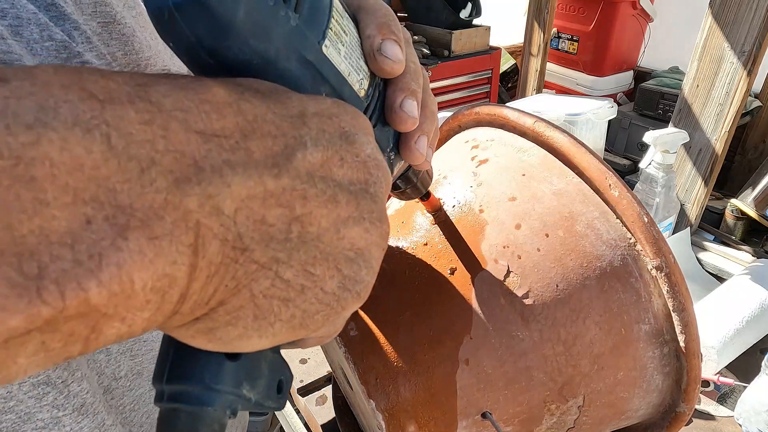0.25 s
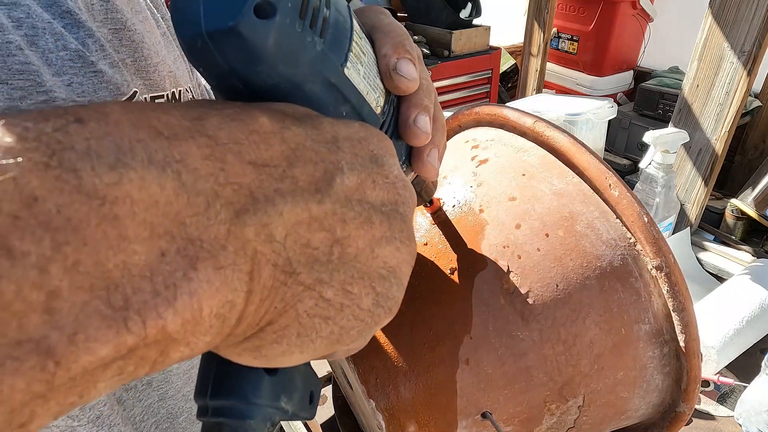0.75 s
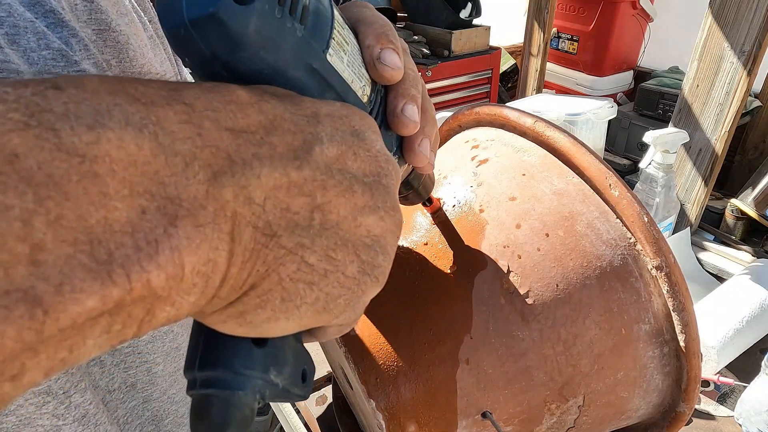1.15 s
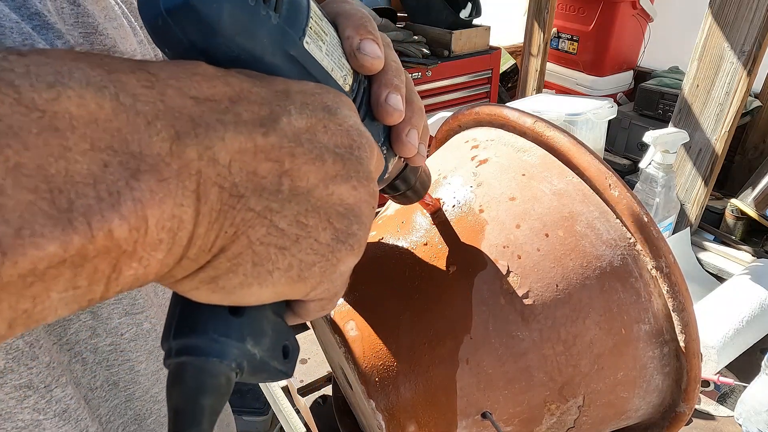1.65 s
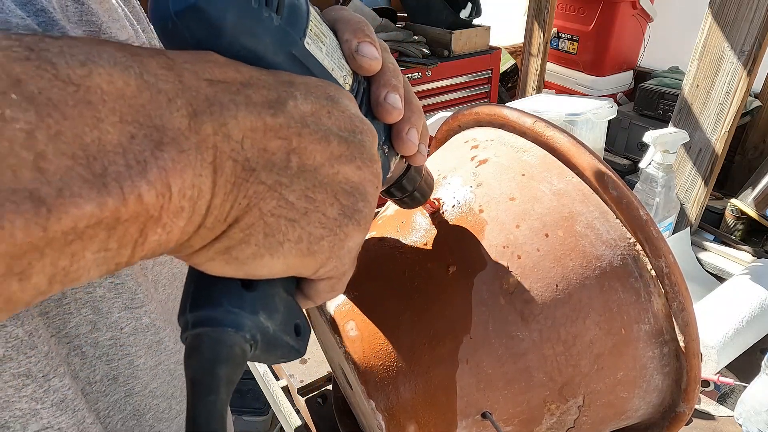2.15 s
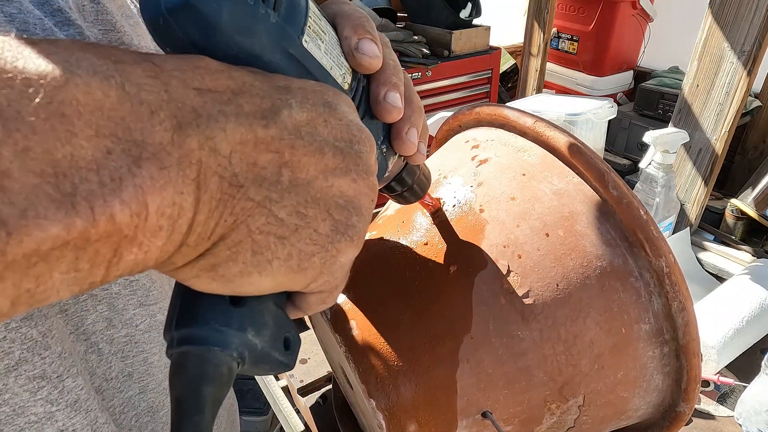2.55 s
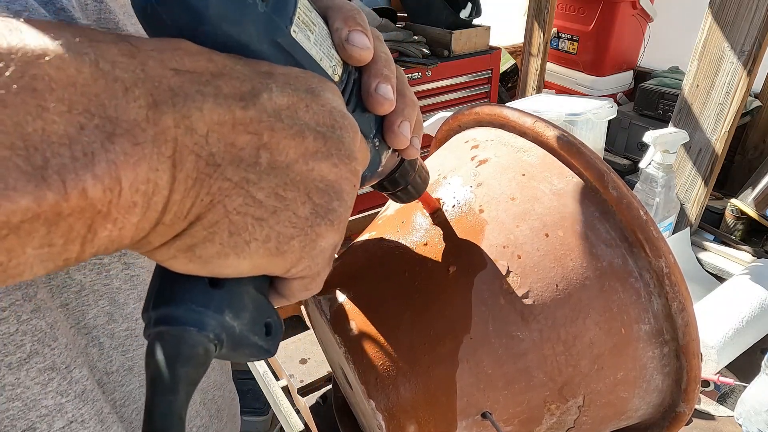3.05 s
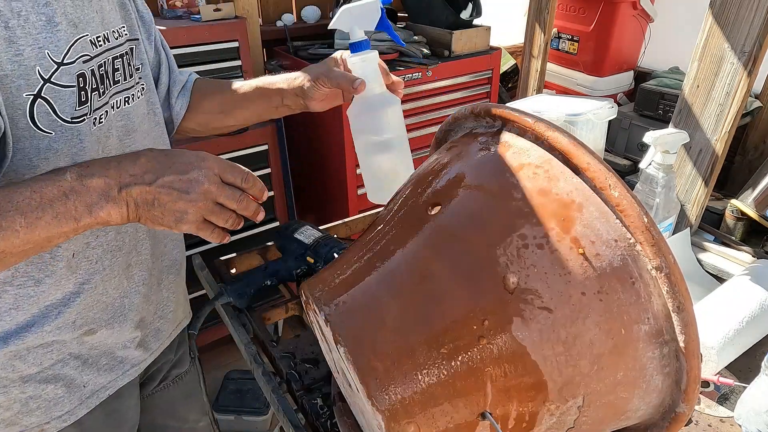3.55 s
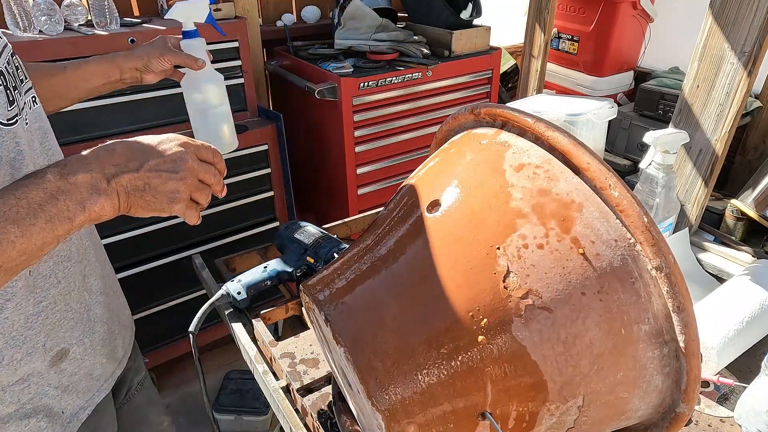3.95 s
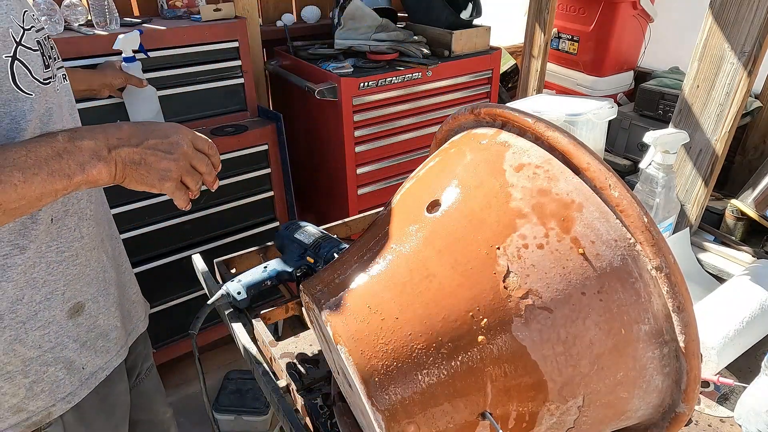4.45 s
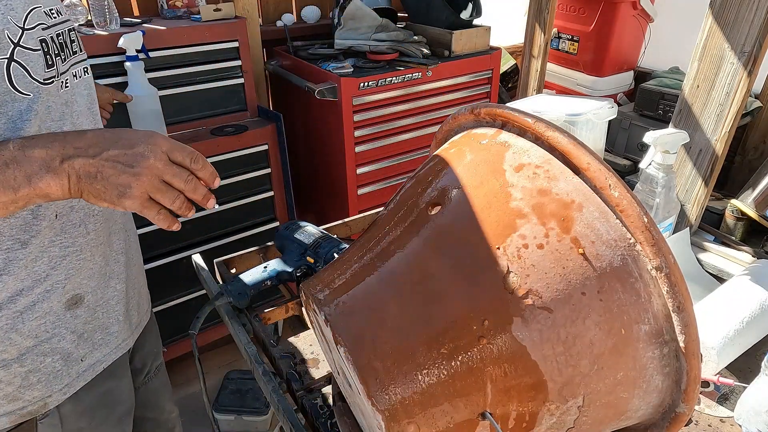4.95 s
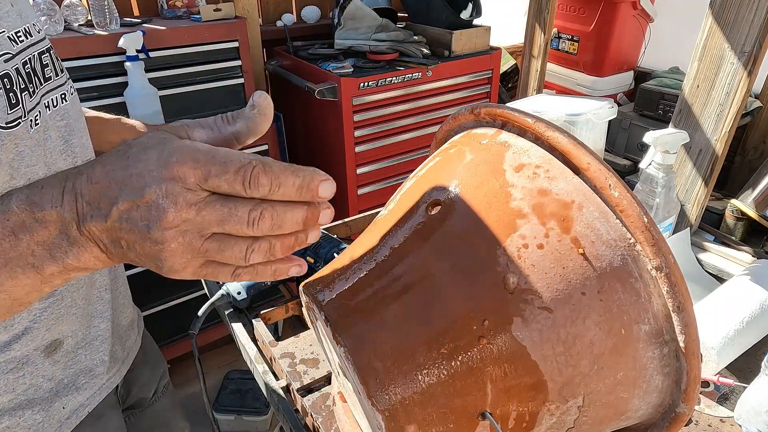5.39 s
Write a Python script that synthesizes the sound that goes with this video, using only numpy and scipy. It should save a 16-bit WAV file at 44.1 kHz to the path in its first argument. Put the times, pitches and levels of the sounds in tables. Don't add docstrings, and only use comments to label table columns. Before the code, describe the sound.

A drill-driven hole saw skates hissing on wet clay, bites into loud rough grinding with sliding motor whine, then cuts to windy quiet and a bottle knock.

```python
import sys
import numpy as np
from scipy import signal
from scipy.fft import rfft, irfft, next_fast_len
from scipy.io import wavfile
from scipy.ndimage import uniform_filter1d

SR = 44100
rng = np.random.default_rng(int(sys.argv[2]) if len(sys.argv) > 2 else 0)


def dump_mix(stems):
    frames = np.atleast_2d(stems).T
    limited = np.clip(frames, -1, 1)
    pcm = np.round(limited * 32767).astype(np.int16)
    wavfile.write(sys.argv[1], SR, pcm)


def field_ratio(decibels):
    return 10 ** (np.asarray(decibels, dtype=float) / 20)


N = 247842

CUT_S = 3.154
BITE_S = .594
MAINS_HZ = 59.8
FIRM_DB = -20

# (frequency [Hz], density [dB per Hz])
YARD_COLOUR = [(71, -34.5), (120, -9), (178, -10.5), (258, -11.5), (296, -29.5), (339, -7.5), (522, -22.5),
               (554, -20), (758, -34.5), (1020, -15.5), (1240, -16.5), (1390, -20), (1500, -23),
               (6810, -35.5), (8200, -38), (9500, -49), (13000, -64)]
# (frequency [Hz], correlation [0-1])
YARD_LIKENESS = [(60, 0.99), (240, 1), (950, 0.84), (3770, 0.4), (15000, 1)]
# (time [s], level [dB])
BREEZE = [(0, -78), (.28, -75), (.36, -56), (.6, -52), (1.3, -54), (2.3, -68), (2.45, -74), (2.8, -58),
          (3.3, -56.5), (3.55, -48), (4.0, -46), (4.5, -43.5), (4.7, -36.5), (5.4, -47), (5.62, -48)]
# (start [s], length [s], peak [dB], puff share [dB], pan [dB])
GUSTS = [
    (3.395, 0.22, -41.5, -33, 0),
    (3.865, 0.24, -38.5, -16, 4),
    (4.044, 0.26, -29.5, -4, -4.5),
    (4.259, 0.18, -32.5, -35, -6),
    (4.57, 0.11, -35, 4, 5),
    (4.688, 0.14, -35, -7, 3),
    (4.968, 0.38, -29, -6.5, -6),
    (5.257, 0.27, -31, -42, -6),
]
# (time [s], peak [dB], pan [dB], push 1 or pull -1)
POPS = [
    (4.114, -20, 2, -1),
    (4.168, -21, -5, 1),
    (4.197, -18, -6, 1),
    (5.111, -18, -4, 1),
    (5.195, -19, 0, -1),
    (5.282, -23, 5, -1),
]
# (frequency [Hz], level [dB])
BUFFET_COLOUR = [(10, 1.5), (30, 7), (60, 3.5), (110, -15), (200, -50), (400, -81)]
# (frequency [Hz], level [dB])
PUFF_COLOUR = [(40, -15), (100, 6.5), (150, -2), (250, -9), (400, -10.5), (700, -77)]

# (time [s], peak [dB], centre [Hz], length [s], pan [dB])
BRUSHES = [(3.283, -47, 3050, 0.01, -3), (3.2955, -41, 2740, 0.0036, 1), (3.298, -44, 2780, 0.022, -3),
           (3.394, -54, 2500, 0.017, 0), (3.5185, -43, 1500, 0.007, 1), (3.54, -54.5, 3600, 0.14, 1),
           (3.6, -48, 1350, 0.085, -1), (3.782, -50, 2000, 0.0083, -2), (4.467, -57, 3000, 0.016, -7),
           (4.673, -42, 4450, 0.018, 5), (4.74, -48, 1190, 0.085, 3), (4.8005, -43.5, 4000, 0.024, 1),
           (4.96, -57, 3000, 0.044, 4), (5.42, -63, 2500, 0.25, 0), (5.265, -60, 2500, 0.0092, -2),
           (5.441, -54, 2000, .006, 0), (5.471, -53, 2500, .006, 0), (5.5635, -50, 2500, .005, 0)]
# (time [s], peak [dB], centre [Hz], length [s], pan [dB])
CLICKS = [(3.515, -57, 8000, .004, 4), (3.535, -48.5, 1310, 0.059, 0), (3.576, -49, 1000, 0.014, 0),
          (3.789, -55, 4970, .003, -1), (3.7957, -56, 9000, .004, -1), (3.84, -48, 1910, 0.0066, -3),
          (3.9015, -48, 5000, .003, 3), (3.906, -54, 8400, .012, 3), (3.921, -51, 6500, .004, 3),
          (3.958, -45, 1400, 0.016, -1), (4.584, -58.5, 8600, .15, 9), (4.876, -68, 7000, .008, 4),
          (4.993, -63, 4500, .008, -4), (5.232, -44, 1860, 0.005, 0.5)]
# (time [s], peak [dB], centre [Hz], length [s], pan [dB])
TAPS = [
    (3.17, -55.5, 320, 0.22, 2),
    (3.195, -60, 2330, 0.097, 0),
    (3.302, -46, 1680, 0.029, -2),
    (3.703, -62, 10000, .012, -2.5),
    (4.212, -47, 1120, 0.028, -2),
    (4.802, -47, 2800, 0.027, -2),
]
# (time [s], peak [dB], centre [Hz], length [s], pan [dB])
RUBS = [
    (3.945, -51.5, 2500, 0.051, -1),
    (4.198, -48, 2500, 0.043, -1),
    (5.49, -54.5, 2500, .06, 0),
]

# (frequency [Hz], level [dB], t60 [s])
CHEST_MODES = [(53, -27, 0.32), (105.3, -20.5, 0.4), (145.3, -29, 0.49), (164.6, -31.5, 0.37),
               (257.5, -39, 0.92), (293, -42, 0.36), (427.3, -29.5, 0.45), (457, -38, 0.27),
               (643, -42, 0.79), (1014, -32, 0.34), (1140, -38, 0.4), (1270, -50, .23), (1380, -33, 0.17),
               (1580, -36, 0.36)]
# (frequency [Hz], width [Hz], level [dB])
BOTTLE_TICK = [(2500, 250, -31.5), (3250, 300, -35), (4400, 390, -33.5), (5390, 580, -39),
               (7460, 2300, -52)]
# (frequency [Hz], density [dB per Hz])
RATTLE_COLOUR = [(88, -39), (150, -8), (346, -14.5), (468, -11.5), (566, -16.5), (1120, -12), (1330, -12.5),
                 (2740, -18), (7770, -34), (14000, -74)]
# (frequency [Hz], t60 [s])
RATTLE_T60 = [(200, 1), (600, 0.77), (1500, 0.44), (4000, 0.41), (12000, 0.4)]

# (time [s], speed [turns/s])
MOTOR_SPEED = [(.72, 200), (.78, 265), (.83, 311), (.93, 378), (1.03, 437), (1.2, 524), (1.35, 581),
               (1.5, 623), (1.7, 655), (1.79, 621), (2.0, 550), (2.32, 448), (2.68, 347), (2.74, 360),
               (2.85, 393), (3.0, 427), (3.08, 418), (3.15, 400)]
# (order [per turn], width [Hz])
ORDER_WIDTHS = [(1, 14), (2, 36), (3, 18), (12, 70)]
# (frequency [Hz], level [dB])
GEARBOX = [(1200, -56), (1550, -50), (1700, -42), (1850, -31.5), (2150, -31), (2600, -32), (2900, -31.5),
           (3250, -35), (3900, -38.5)]
# (frequency [Hz], level [dB])
HOUSING = [(250, -46), (450, -40), (640, -46), (850, -41.5), (1180, -36.5), (1650, -36), (1880, -30.5),
           (4000, -51.5), (7000, -49.5)]

# (time [s], pressure [dB])
PRESSURE = [(0.0, -29.5), (0.2, -27.5), (0.335, -28), (0.365, -33.5), (0.42, -28), (0.48, -32),
            (0.56, -33.5), (0.6, -28.5), (0.63, -34), (0.676, -25.5), (0.82, -21), (1.03, -18.5),
            (1.5, -17.5), (1.92, -20), (1.99, -19), (2.26, -19.5), (2.29, -21.5), (2.65, -25),
            (2.75, -19.5), (2.94, -21.5), (3.15, -25)]
# (start [s], drop [dB], length [s])
LIFTS = [(.021, 6.5, 0.024), (.06, 2, 0.055), (.131, 14, 0.0039), (.145, 11, 0.012), (.265, 13, 0.0058),
         (.342, 9, 0.0088), (.357, 16, 0.0055), (.395, 10, 0.0095), (.411, 5, 0.0045), (.426, 2, 0.0046),
         (.433, 3, 0.0045), (.453, 16, 0.0084), (.472, 14, .006), (.495, 7, 0.0056), (.512, 11, 0.017),
         (.538, 1, .004), (.547, 16, 0.012), (.566, 9, 0.0034), (.574, 14, 0.0065)]
# (middle [s], rise [dB])
CATCHES = [(0.699, 3), (0.742, 2.5), (0.854, 0.5), (0.945, 3), (1.264, 0), (2.13, 1.5), (2.324, 1),
           (2.419, 2), (2.521, 4), (2.575, 3.5), (2.6, 3.5), (2.661, 2.5), (2.747, 2), (2.845, 4.5),
           (2.862, 2.5), (2.913, 0), (2.931, -0.5), (2.96, 2.5), (3.036, 2.5), (3.085, 2.5), (3.112, 5.5)]
# (middle [s], drop [dB])
SLIPS = [(0.69, 6.5), (0.773, 1.5), (0.802, 3), (0.89, 2), (0.954, 4.5), (0.987, 3.5), (1.023, 2.5),
         (1.119, 6), (1.236, 3.5), (1.401, 2), (1.691, 2.5), (1.794, 2.5), (1.901, 5.5), (1.972, 3.5),
         (2.165, 2), (2.24, 6), (2.313, 4), (2.364, 3.5), (2.386, 3), (2.41, 3.3), (2.482, 6), (2.504, 3),
         (2.567, 3), (2.621, 5.5), (2.65, 2.5), (2.678, 8), (2.705, 5.5), (2.77, 8), (2.792, 3.5),
         (2.875, 2), (2.891, 11), (2.904, 1.5), (2.975, 6.2), (2.999, 5.5), (3.047, 5), (3.064, 4),
         (3.076, -1), (3.101, 9.5)]
# (frequency [Hz], density [dB per Hz])
SKATE_COLOUR = [(35, -50), (60, -58), (110, -50), (141, -28), (185, -25), (312, -13), (479, -8.5),
                (1000, -4), (1260, -7.5), (1970, 0.5), (6200, -4.5), (8060, -56), (13600, -120)]
# (frequency [Hz], density [dB per Hz])
BITE_COLOUR = [(35, -44), (60, -19.5), (236, -18), (312, -13.5), (453, -8.5), (1170, -6), (1670, 2.5),
               (2150, -0.5), (3190, 2), (5200, -5.5), (7200, -16), (8100, -42.5), (12600, -25.5),
               (15500, -45.5)]
# (frequency [Hz], width [Hz], level [dB])
GLAZE_MODES = [(2000, 99, -9), (2600, 71, -9), (3140, 740, -1.5), (4200, 580, -2)]
# (frequency [Hz], width [Hz], level [dB])
CLAY_MODES = [(1070, 326, -3), (3210, 130, -13)]
# (time [s], frequency [Hz], level [dB])
RIDGE = [(.62, 5750, -17.5), (1.1, 5550, -21), (1.6, 4860, -20.5), (2.4, 4830, -24), (3.15, 4640, -30)]
# (frequency [Hz], density [dB per Hz])
SIZZLE_COLOUR = [(2940, -22.5), (5000, -2.5), (5820, -8), (6830, -3), (9610, -7.5), (11100, -13),
                 (13300, -14.5), (15500, -12)]
# (frequency [Hz], density [dB per Hz])
SPRAY_COLOUR = [(2650, -30.5), (4500, -0.5), (6230, -11), (7590, -6.5), (8860, -10.5), (11600, -13.5),
                (14000, -24), (15500, -50)]
# (frequency [Hz], width [Hz], level [dB])
FREE_CUP_MODES = [(6800, 210, 4), (7340, 260, -2.5), (8600, 330, 1), (10500, 400, -19), (11000, 590, -14)]
# (frequency [Hz], width [Hz], level [dB])
BURIED_CUP_MODES = [(5900, 210, 0), (6800, 290, 1.5), (7580, 800, -12), (9800, 150, -13.5)]
# (time [s], level [dB])
KERF_RING = [(1.3, -10.5), (2.3, -12.5)]
# (start [s], length [s], from [Hz], to [Hz], level [dB])
SWELLS = [(0.063, .14, 7350, 7440, -38), (.1, 0.47, 11500, 11000, -43), (0.303, 0.26, 6800, 6800, -30.5),
          (0.377, 0.26, 11000, 10700, -43), (.42, .12, 13100, 13100, -47), (0.177, 0.042, 3100, 3140, -32),
          (.518, 0.02, 2570, 2600, -29), (0, 0.13, 2000, 1940, -38), (0.232, 0.089, 1950, 2000, -46.5),
          (0.407, 0.039, 1720, 1710, -35), (0.223, 0.17, 3150, 3100, -42.5),
          (0.587, 0.0092, 1200, 1200, -40), (0.6, .015, 11000, 11000, -47), (0.65, 0.027, 8600, 8600, -48),
          (0.654, 0.16, 2500, 2720, -31), (0.665, 0.18, 3130, 3280, -34), (0.666, .1, 800, 800, -39.5),
          (0.686, 0.038, 1490, 1490, -54), (0.928, 0.168, 2300, 2830, -33.5), (0.722, .2, 2300, 2310, -41),
          (0.968, 0.076, 2600, 2670, -33.5), (1.2, 0.27, 3320, 3250, -41), (1.54, 0.094, 3200, 3300, -33),
          (1.663, 0.31, 1070, 1200, -34), (1.907, 0.32, 3080, 3200, -33), (1.708, 0.43, 8600, 8500, -41),
          (1.75, .35, 10100, 10000, -45.5), (2.175, 0.26, 2600, 2600, -34), (2.29, 0.14, 5170, 5050, -32.5),
          (2.38, 0.38, 1040, 1060, -40.5), (2.455, 0.33, 7600, 7300, -37.5), (2.5, 0.32, 9600, 9600, -39.5),
          (2.587, 0.12, 1950, 2040, -35), (2.9, 0.34, 1070, 1080, -42), (2.69, 0.16, 3040, 3030, -33),
          (2.786, 0.074, 3900, 3880, -31), (2.904, 0.25, 5160, 4750, -34), (3.002, 0.25, 9800, 9800, -38.5),
          (3.03, 0.1, 7600, 7640, -32.5)]
# (start [s], length [s], hum [dB], wall ring [dB])
SINGS = [(0.361, 0.11, -32.5, -39), (0.805, 0.17, -36.5, -48.5), (0.984, 0.093, -32, -39),
         (1.11, 0.1, -46.5, -27), (1.185, 0.11, -57, -24.5), (1.272, 0.21, -36, -23),
         (1.474, 0.24, -34.5, -26.5), (1.523, 0.072, -44, -18), (1.63, 0.076, -39.5, -37),
         (1.944, 0.21, -38.5, -27), (2.19, 0.067, -44, -34.5), (2.486, 0.11, -39, -56),
         (2.693, 0.22, -35.5, -28)]
# (frequency [Hz], width [Hz], level [dB], wakes at [s])
WALL_RINGS = [(1666, 17, -2, -3), (2416, 61, -6, 0.9), (1957, 65, 2, 2.5)]

# (frequency [Hz], level [dB])
ECHO_COLOUR = [(60, -8), (180, -8), (290, -23), (640, -21.5), (1410, -19.5), (3100, -18), (6820, -12),
               (10000, -7), (15000, 4)]
# (frequency [Hz], level [dB])
NARROW_KERF_SHADE = [(100, -33), (400, -19.5), (2500, -22), (5500, -13), (7500, -7), (10500, -11), (11500, 0),
                     (15000, 1)]
# (frequency [Hz], level [dB])
LEFT_LEAN = [(3000, -51.5), (5000, -22), (8100, -16), (15000, -13)]
# (frequency [Hz], level [dB])
MIC_RESPONSE = [(20, 2), (7500, -3), (9000, -7.5), (13800, -7), (14400, -9), (14800, -28), (15500, -43),
                (16000, -68.5)]


def evened(x):
    return x / np.sqrt(np.mean(x ** 2) + 1e-20)


def read(points, hz):
    f, value = np.transpose(points)
    return np.interp(np.log(hz + 1), np.log(f + 1), value)


def columns(rows):
    s, *values = np.transpose(rows)
    return [np.interp(np.arange(N) / SR, s, v) for v in values]


def add(mix, s, sound):
    part = mix[..., round(s * SR):][..., :sound.shape[-1]]
    part += sound[..., :part.shape[-1]]


def colour(x, points):
    size = next_fast_len(x.shape[-1] + 4096)
    gain = field_ratio(read(points, np.fft.rfftfreq(size, 1 / SR)))
    return irfft(rfft(x, size) * gain, size)[..., :x.shape[-1]]


def resonate(x, hz, width):
    turn = np.exp(2j * np.pi * np.cumsum(hz * np.ones(len(x))) / SR)
    r = np.exp(-np.pi * width / SR)
    return 2 * (turn * signal.lfilter([1 - r], [1, -r], x / turn)).real


def resonate_twice(x, hz, width):
    return evened(resonate(resonate(x, hz, width), hz, 2 * width))


def steadied(x):
    power = uniform_filter1d(evened(x) ** 2, size=300).clip(0)
    return evened(x / (power + .1) ** .35)


def wander(hz):
    return evened(signal.lfilter(*signal.butter(2, hz, fs=SR), rng.standard_normal(N)))


def bumps(rows):
    out = np.zeros(N)
    for s, height, length in rows:
        add(out, s, height * signal.windows.tukey(round(max(length, .004) * SR), .4))
    return out


def panned(x, pan_db):
    return np.array([x * field_ratio(pan_db / 2), x * field_ratio(-pan_db / 2)])


def yard():
    hz = np.fft.rfftfreq(N, 1 / SR)
    same = np.clip(read(YARD_LIKENESS, hz), 0, 1)
    a, b = rfft(rng.standard_normal((2, N)))
    air = colour(irfft(np.array([a, same * a + np.sqrt(1 - same ** 2) * b]), N), YARD_COLOUR)
    fade_s = 0.042
    dip = np.clip(0.29 + abs(np.arange(N) / SR - CUT_S) / fade_s / 2, 0, 1)
    return evened(air) * field_ratio(-54.5 + 0.72 * wander(44)) * dip


def wind():
    blow = field_ratio(columns(BREEZE)[0]) * np.ones((2, 1))
    puff = blow.copy()
    for s, length, db, puff_db, pan_db in GUSTS:
        swell = panned(field_ratio(db) * np.hanning(round(length * SR)), pan_db)
        add(blow, s, swell)
        add(puff, s, swell * field_ratio(puff_db))
    shared, left, right = rng.standard_normal((3, N))
    air = np.array([shared + 0.27 * left, shared + 0.35 * right]) * field_ratio(3.4 * wander(38))
    out = blow * evened(colour(air, BUFFET_COLOUR))
    out += puff * field_ratio(-8.0) * evened(colour(air + .5 * np.array([left, right]), PUFF_COLOUR))
    u = np.linspace(-4, 4, 900)
    pop = (1 - 1.02 * u ** 2) * np.exp(-u ** 2)
    for s, db, pan_db, push in POPS:
        add(out, s - 450 / SR, panned(push * field_ratio(db) * pop, pan_db))
    return out


def rustles():
    size = 8000
    out, t, band_hz = np.zeros((2, N)), np.arange(size) / SR, np.fft.rfftfreq(size, 1 / SR)
    snap_s, rub_rise_s = 0.00068, 0.012
    # (events, band width as a share of the centre, rise [s])
    kinds = (BRUSHES, 1.7, snap_s), (CLICKS, 0.71, snap_s), (TAPS, 0.39, snap_s), (RUBS, 1.7, rub_rise_s)
    for rows, share, rise_s in kinds:
        for s, db, hz, length, pan_db in rows:
            grain = field_ratio(1.5 * rng.standard_normal(80).repeat(100))
            noise = rng.standard_normal((3, size)) * grain
            band = np.exp(-2 * ((band_hz / hz - 1) / share) ** 2)
            scuff = irfft(rfft(noise[0] + 0.43 * noise[1:]) * band)
            shape = np.minimum(t / rise_s, 1) * np.exp(-(t / length) ** 2)
            pan = field_ratio(np.array([[pan_db], [-pan_db]]) / 2)
            add(out, s, field_ratio(db - 4.5) * evened(scuff) * shape * pan)
    return out


def chest_boom(t, lag_s):
    boom = sum(field_ratio(db - 60 * t / t60) * np.cos(2 * np.pi * hz * (t - lag_s)) for hz, db, t60 in CHEST_MODES)
    return boom * np.clip((t - .006) / 0.017, 0, 1)


def chest_rattle(t):
    noise = rng.standard_normal((3, SR)) * field_ratio(.6 * wander(90)[:SR])
    hz, frame_s, z = signal.stft(colour(noise[0] + 0.14 * noise[1:], RATTLE_COLOUR), SR, nperseg=256)
    decay = field_ratio(-60 * frame_s / read(RATTLE_T60, hz)[:, None])
    tail = signal.istft(z * decay, SR, nperseg=256)[1][:, :SR]
    return tail / np.sqrt(np.mean(tail[:, :2000] ** 2)) * np.clip(t / 0.012, .55, 1)


def bottle_tick(t):
    scrape = rng.standard_normal(SR)
    tick = sum(field_ratio(db) * evened(resonate(resonate(scrape, hz, w), hz, w)) for hz, w, db in BOTTLE_TICK)
    crack = evened(colour(scrape, [(600, -23), (2500, 6), (6000, -15), (12000, -37)]))
    return tick * np.exp(-(t / 0.013) ** 2) + field_ratio(-34) * crack * np.exp(-t / 0.0022)


def knock():
    t, lag_s, bounces_per_s = np.arange(SR) / SR, .0145, 53.5
    bounce = 1 + 0.25 * np.cos(2 * np.pi * bounces_per_s * (t - lag_s))
    rattle = field_ratio(-27.5) * chest_rattle(t) * bounce
    out = np.zeros((2, N))
    add(out, 4.5765, rattle + chest_boom(t, lag_s) + bottle_tick(t))
    return out * field_ratio(np.array([[-1.5], [1.5]]))


def torque():
    t = np.arange(N) / SR
    once = .06 * np.cos(2 * np.pi * MAINS_HZ * t)
    return 1 + once + .09 * np.cos(2 * np.pi * 2 * MAINS_HZ * t + 1.3)


def grip():
    out = np.zeros(N)
    for rows, length, sign in ((CATCHES, 0.014, 1), (SLIPS, 0.011, -1)):
        for s, db in rows:
            add(out, s - length / 2, sign * 1.23 * db * np.hanning(round(length * SR)))
    return out


def gear_teeth(speed_hz, mesh_order):
    t = np.arange(N) / SR
    teeth = np.cos(2 * np.pi * np.cumsum(mesh_order * speed_hz * (1 + .004 * wander(40))) / SR)
    teeth *= 1 + .5 * np.cos(2 * np.pi * MAINS_HZ * t + .5 * wander(6))
    return teeth * (1 + .4 * np.cos(2 * np.pi * 2 * MAINS_HZ * t))


def motor():
    speed_hz = columns(MOTOR_SPEED)[0]
    load_db = 1.86 * (columns(PRESSURE)[0] - FIRM_DB)
    gaining = uniform_filter1d(np.gradient(speed_hz) * SR, size=4000)
    drive = np.maximum(np.tanh(gaining / 240), -0.92)
    noise = rng.standard_normal(N) * torque()

    spin_db = load_db - 0.7 * drive + 3 * np.log2(speed_hz / 600)
    out = np.zeros(N)
    for order, width in ORDER_WIDTHS:
        hz = order * speed_hz
        out += field_ratio(read(HOUSING, hz) + spin_db) * steadied(resonate_twice(noise, hz, width))

    mesh_order = 6
    mesh_db = read(GEARBOX, mesh_order * speed_hz) + 7.5 * drive
    rough = steadied(resonate_twice(noise, mesh_order * speed_hz, 240)) * torque() ** 2
    out += field_ratio(mesh_db) * (.75 * rough + .75 * gear_teeth(speed_hz, mesh_order))

    whining = np.clip((speed_hz - 612) / 14, 0, 1)
    whine = field_ratio(-51) * whining * steadied(resonate_twice(noise, 19.27 * speed_hz, 30))
    running = np.clip((np.arange(N) / SR - .7) / 0.026, .0, 1)
    return running * field_ratio(0.93 * grip()) * out + whine


def grit(spread_db, per_s):
    struck = rng.random(N) < per_s / SR
    size = field_ratio(spread_db * np.minimum(rng.exponential(1, N), 2.5)) * struck
    return evened(size * rng.standard_normal(N)) + 0.74 * rng.standard_normal(N)


def chatter(over_db):
    slow = evened(resonate(wander(250), 43.8, 34))
    fast = evened(resonate(wander(350), 198.0, 62))
    return field_ratio(np.clip(1.2 - .1 * over_db, 0, 4) * (0.42 * slow + 0.75 * fast))


def body(drive, spectrum, modes, ring_db, first, last):
    part, out = drive[first:last], np.zeros(N)
    rings = 0
    for hz, width, db in modes:
        drift = 1 + .011 * wander(7)[first:last]
        rings = rings + field_ratio(db) * resonate_twice(part, hz * drift, width)
    out[first:last] = evened(evened(colour(part, spectrum)) + field_ratio(ring_db) * rings)
    return out


def pot_grind(drive, bite, cut):
    pot = body(drive, SKATE_COLOUR, GLAZE_MODES, -10.5, 0, bite)
    pot += body(drive, BITE_COLOUR, CLAY_MODES, -13.5, bite, cut)
    ridge_hz, ridge_db = columns(RIDGE)
    ridge = evened(resonate(resonate(drive, ridge_hz, 900), ridge_hz, 1200))
    pot[bite:] += (field_ratio(ridge_db) * ridge)[bite:]
    return pot


def cup_sizzle(steel, bite, cut):
    tilt = .84 + .16 * np.minimum(np.arange(bite) / SR / .28, 1)
    free = [(hz * tilt if k == 2 else hz, w, db) for k, (hz, w, db) in enumerate(FREE_CUP_MODES)]
    cup = body(steel, SIZZLE_COLOUR, free, -10.0, 0, bite)
    return cup + body(steel, SPRAY_COLOUR, BURIED_CUP_MODES, columns(KERF_RING)[0][bite:cut], bite, cut)


def sizzle_level(over_db):
    t = np.arange(N) / SR
    wide = np.clip((t - 1.34) / (1.46 - 1.34), 0, 1)
    tight_db, loose_db = -44 + 0.64 * over_db, -35 - 1.1 * over_db
    buried_db = (1 - wide) * tight_db + wide * loose_db
    return np.where(t < BITE_S, -25.5 + 0.52 * over_db, buried_db)


def swells(drive):
    out = np.zeros(N)
    for s, length, from_hz, to_hz, db in SWELLS:
        part = drive[round(s * SR):][:round(length * SR)]
        hz = np.linspace(from_hz, to_hz, len(part))
        ring = resonate_twice(part, hz, 230 + .035 * from_hz)
        add(out, s, field_ratio(db) * signal.windows.tukey(len(part), .7) * ring)
    return out


def pot_song(drive, over_db):
    t = np.arange(N) / SR
    hum = field_ratio(-67 + over_db) + bumps([(s, field_ratio(db), length) for s, length, db, _ in SINGS])
    ring = field_ratio(-42 + over_db) + bumps([(s, field_ratio(db), length) for s, length, _, db in SINGS])
    low = evened(resonate(resonate(drive, 310.0, 27.9), 354, 75))
    wall = np.zeros(N)
    for hz, width, db, wakes_s in WALL_RINGS:
        tone = steadied(resonate(resonate(drive, hz, width), hz, 4 * width))
        wall += field_ratio(db) * tone * np.clip((t - wakes_s) / 0.25, .3, 1)
    return hum * field_ratio(-7.0) * low + ring * field_ratio(-6.5) * wall


def saw():
    grind_db = columns(PRESSURE)[0]
    over_db = grind_db - FIRM_DB
    bite, cut = round(BITE_S * SR), round(CUT_S * SR)
    chatter_gain = chatter(over_db)
    drive = grit(spread_db=2.0, per_s=5000) * torque() * chatter_gain
    steel = grit(spread_db=3.5, per_s=12000) * chatter_gain
    lift_db, grip_db = bumps(LIFTS), grip()
    out = pot_grind(drive, bite, cut) * field_ratio(grind_db - 0.36 * lift_db + 1.01 * grip_db)
    out += cup_sizzle(steel, bite, cut) * field_ratio(sizzle_level(over_db) + 1.0 - lift_db + 1.13 * grip_db)
    out += swells(drive) * field_ratio(0.44 * grip_db - 0.99 * lift_db)
    return out + pot_song(drive, over_db)


def drilling():
    work, t = saw() + motor(), np.arange(N) / SR
    smear = rng.standard_normal((2, 2500)) * np.exp(-np.arange(2500) / 1400.0)
    turn = 2 * np.pi * 6 * t + 2 * wander(5.5)
    moving = work * np.array([np.cos(turn), np.sin(turn)])
    echoes = signal.oaconvolve(moving, smear / np.linalg.norm(smear[0]), axes=1)
    side = colour(echoes.sum(0)[:N], ECHO_COLOUR)
    open_share = np.clip((t - 1.26) / (2.43 - 1.26), 0, 1)
    side = open_share * side + (1 - open_share) * colour(side, NARROW_KERF_SHADE)
    lean = open_share * colour(work, LEFT_LEAN)
    return np.array([work + side + lean, work - side - lean]) * (t < CUT_S)


def scene():
    return yard() + wind() + rustles() + knock() + drilling()


def roll_off(x):
    return signal.sosfilt(signal.butter(12, 15700, fs=SR, output="sos"), x)


def record(dry):
    limit = .5
    heard = colour(dry, MIC_RESPONSE)
    return roll_off(limit * np.tanh(heard / limit))


dry = scene()
out = record(dry)
dump_mix(out)
```